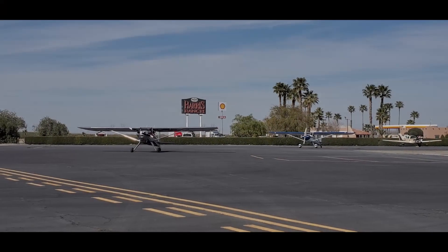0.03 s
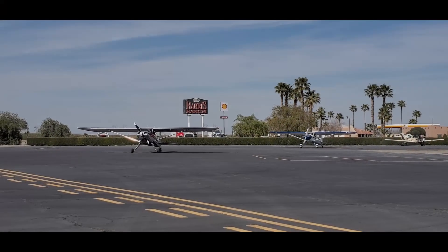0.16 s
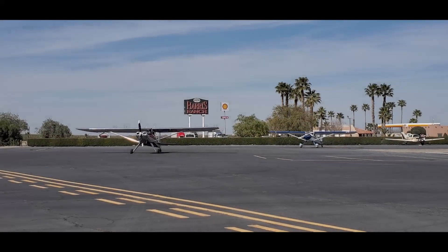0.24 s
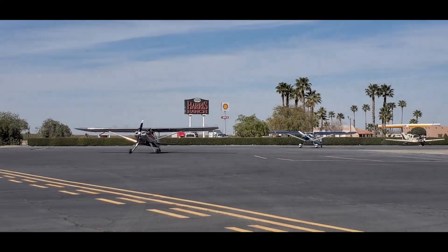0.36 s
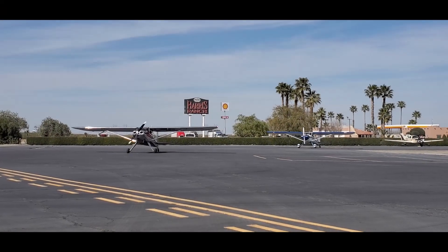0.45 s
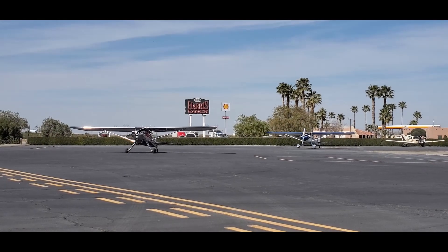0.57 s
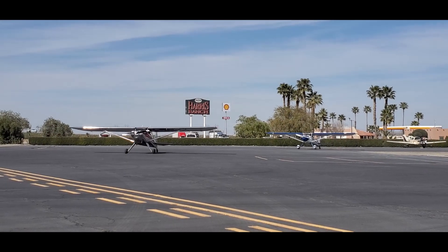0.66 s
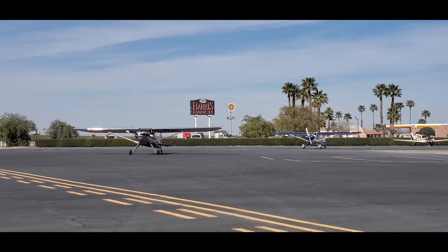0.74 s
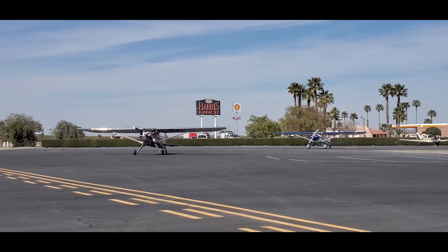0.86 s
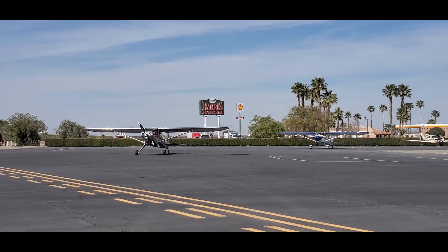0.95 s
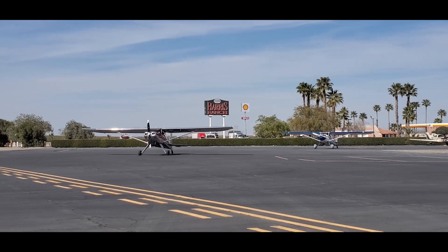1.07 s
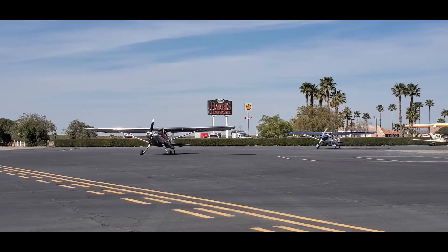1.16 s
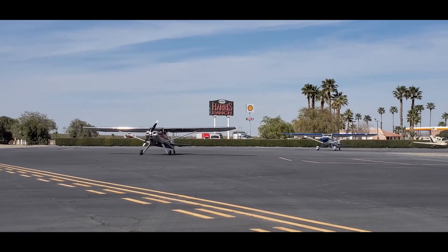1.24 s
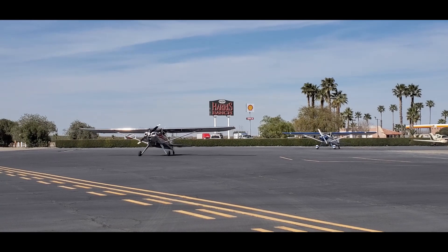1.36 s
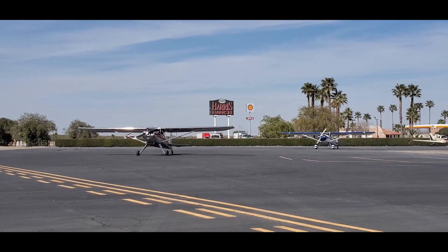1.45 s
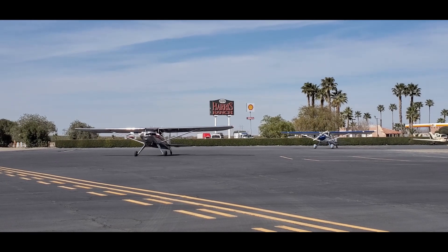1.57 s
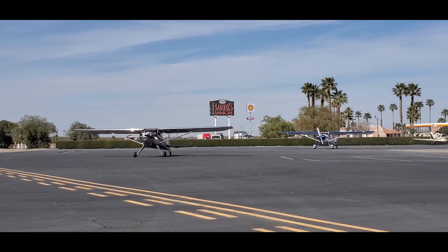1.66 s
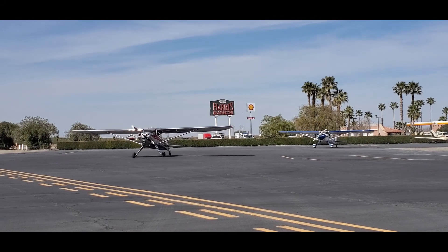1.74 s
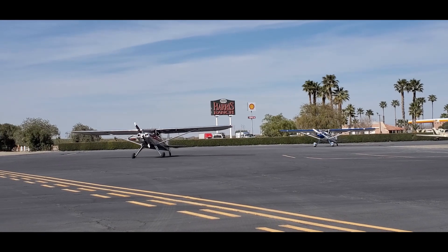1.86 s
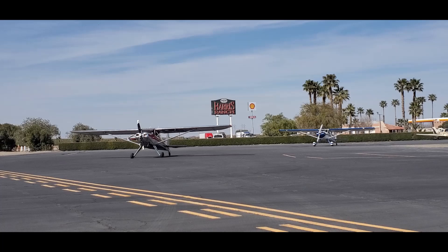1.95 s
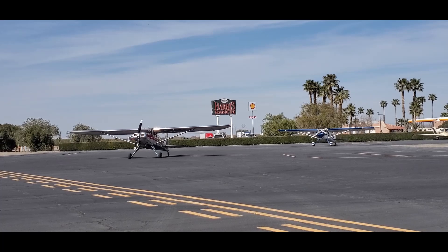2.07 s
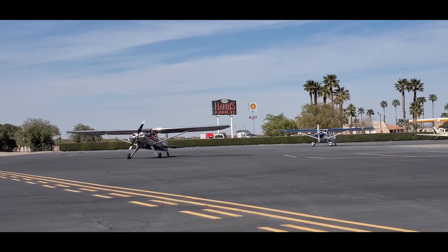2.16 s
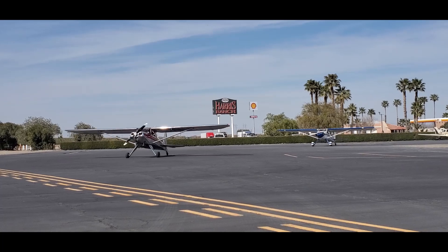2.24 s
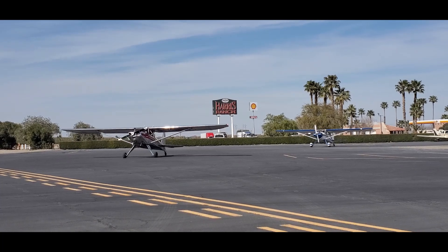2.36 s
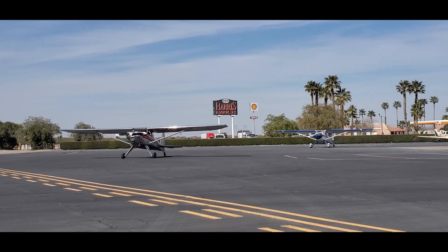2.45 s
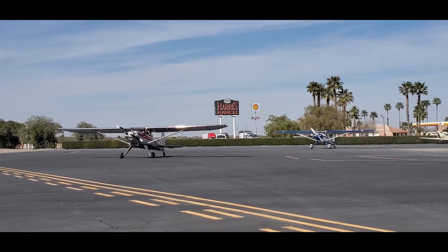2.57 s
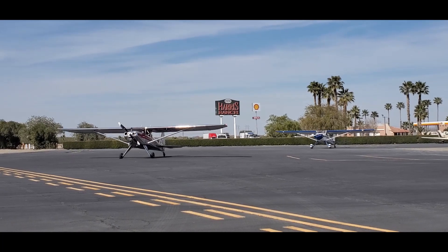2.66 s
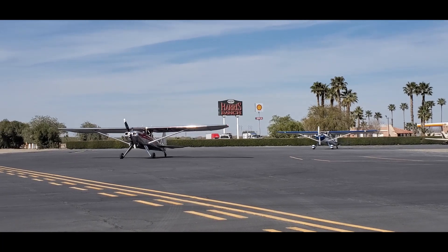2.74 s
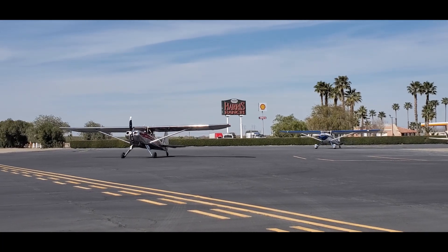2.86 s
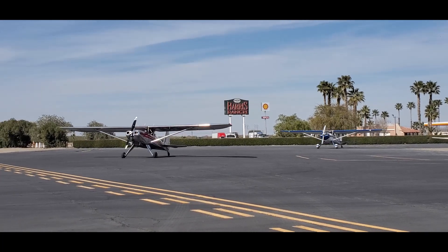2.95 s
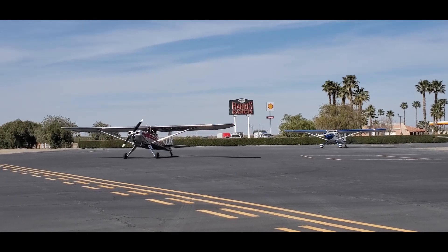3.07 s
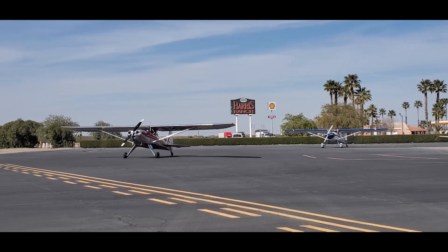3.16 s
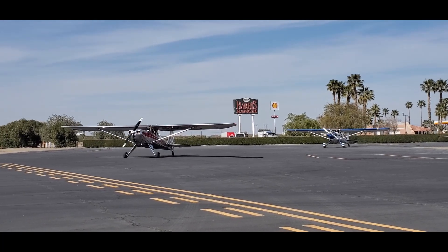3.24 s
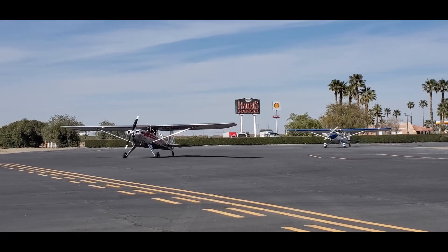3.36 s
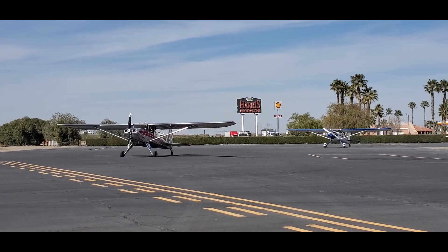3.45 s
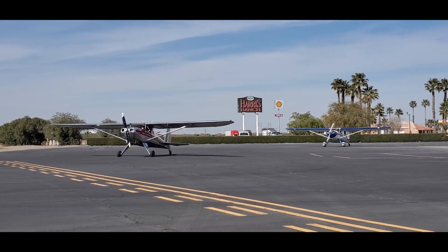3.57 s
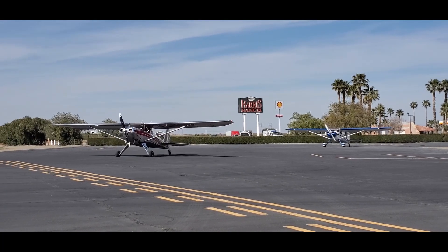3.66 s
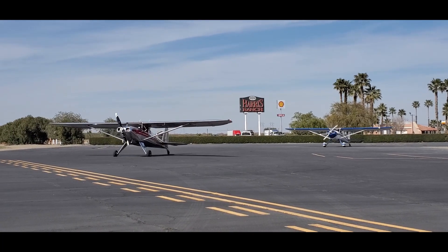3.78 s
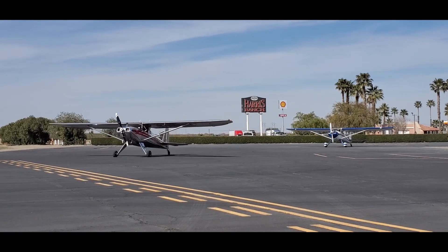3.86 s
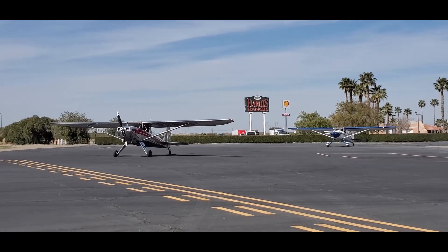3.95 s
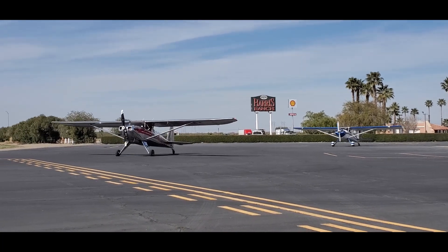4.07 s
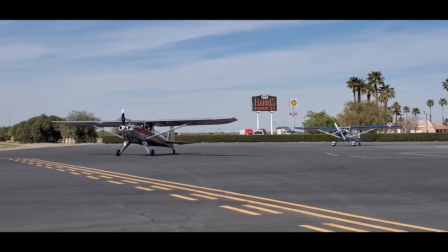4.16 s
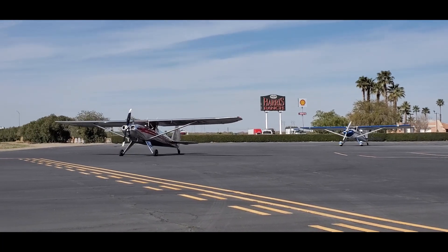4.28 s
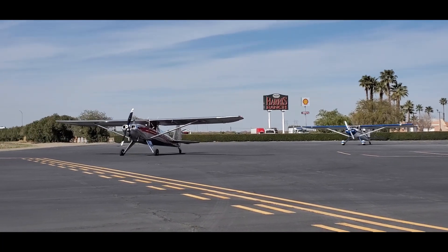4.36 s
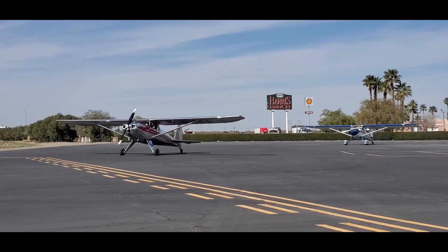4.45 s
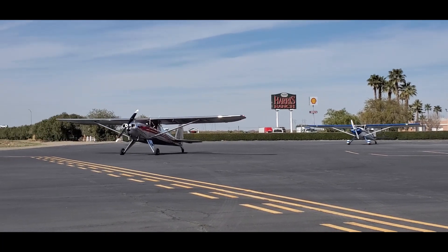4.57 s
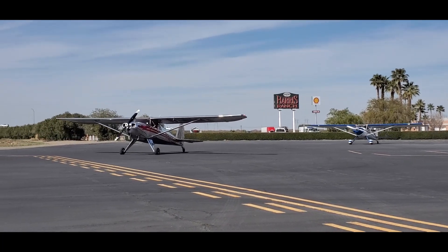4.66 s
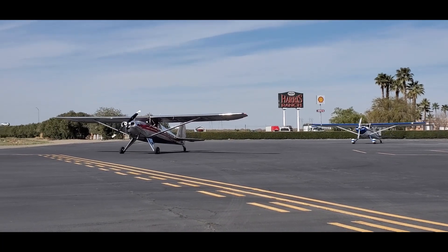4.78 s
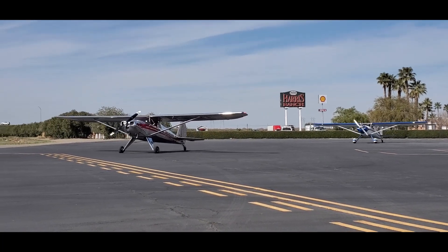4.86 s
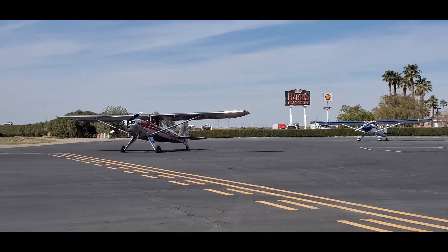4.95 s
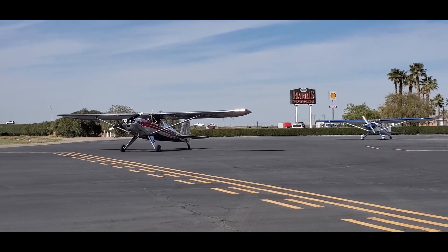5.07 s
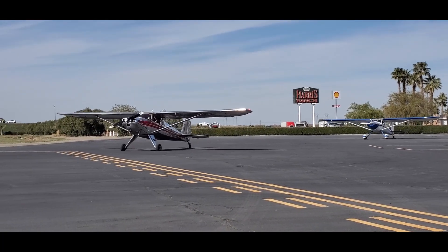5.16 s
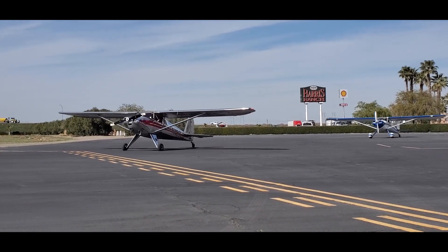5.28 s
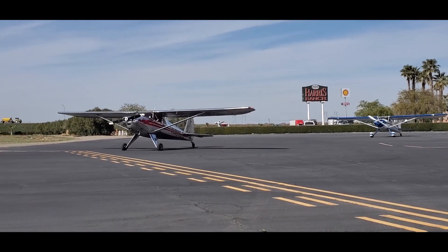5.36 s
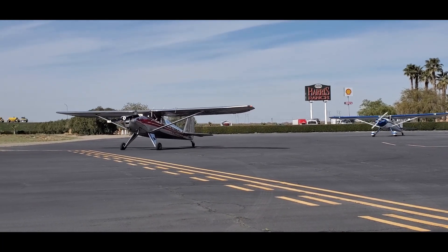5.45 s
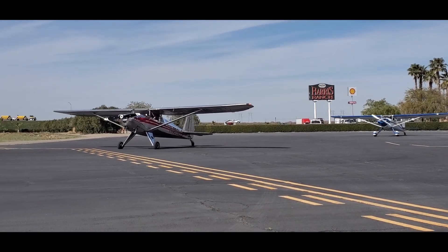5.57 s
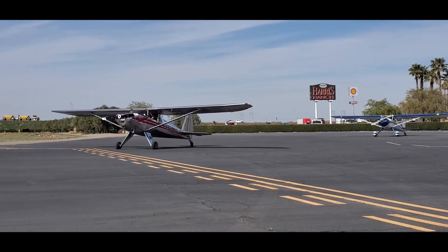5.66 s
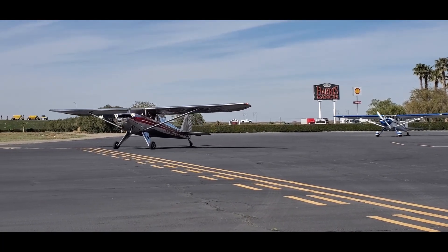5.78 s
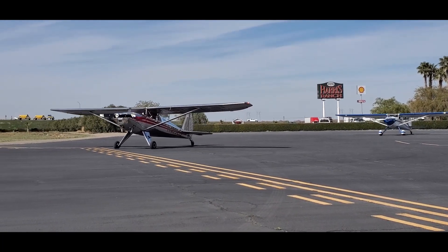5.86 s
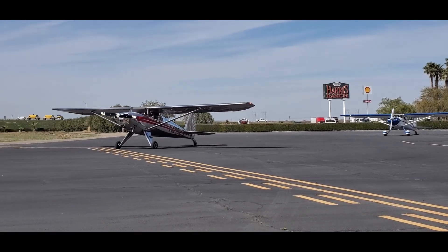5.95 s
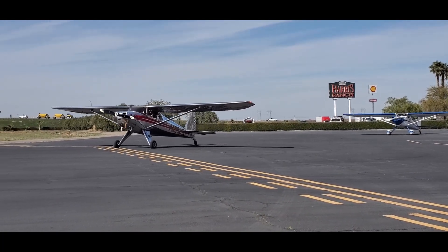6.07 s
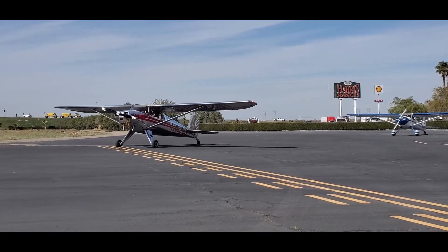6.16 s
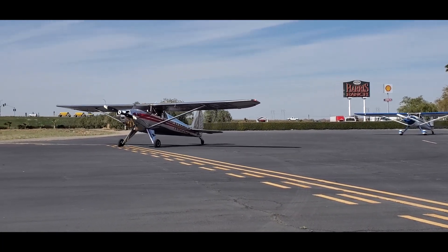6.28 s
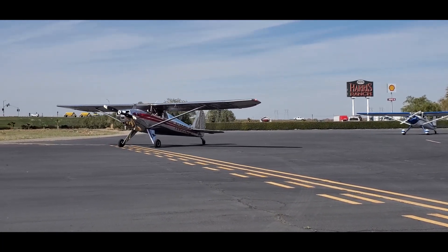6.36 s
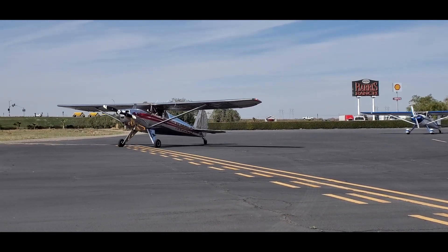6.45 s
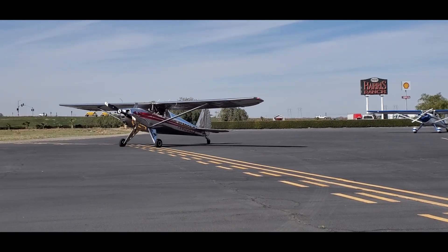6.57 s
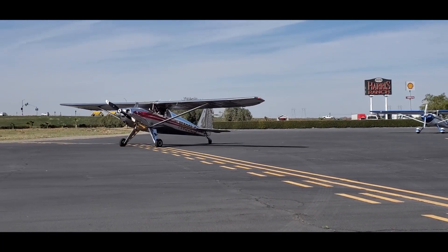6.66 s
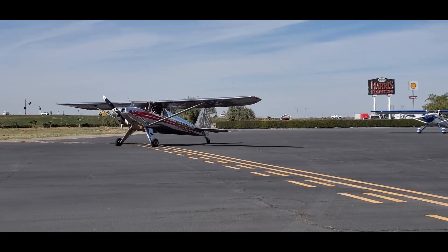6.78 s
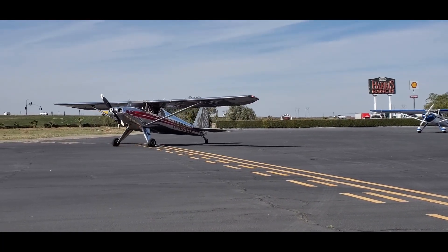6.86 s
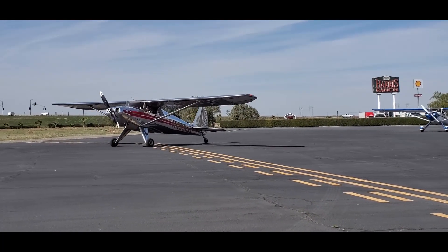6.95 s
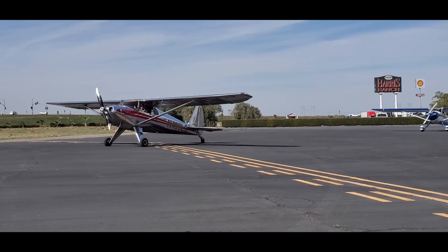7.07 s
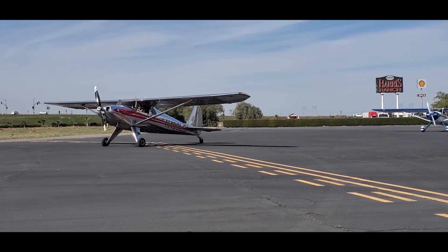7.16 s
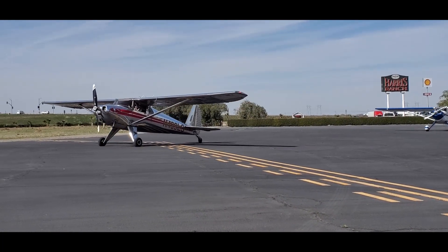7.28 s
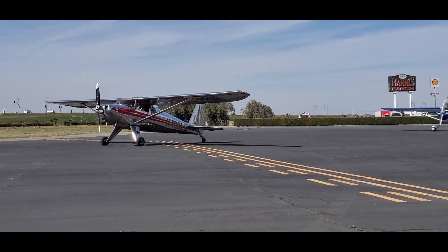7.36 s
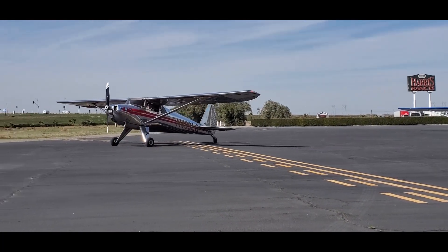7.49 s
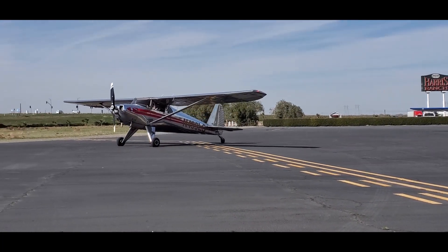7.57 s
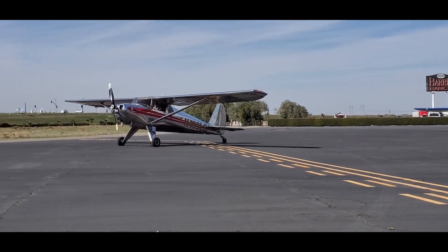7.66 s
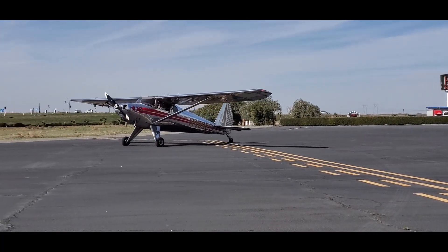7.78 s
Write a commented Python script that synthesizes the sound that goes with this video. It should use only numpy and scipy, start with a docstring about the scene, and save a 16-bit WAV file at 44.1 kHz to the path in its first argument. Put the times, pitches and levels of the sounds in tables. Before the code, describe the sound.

Outdoors on an open airport ramp, a light plane taxis slowly nearer with its piston engine idling. A low, uneven exhaust drone beats against the hum of a second plane further back. Fast metallic clatter and fluttering propeller air build over the first few seconds, then hold steady. The stereo microphone is exposed, with hollow reflections from the ground and a nearby surface.

```python
"""Light plane taxiing closer on an open ramp

A light plane taxis slowly closer over an open ramp, its flat-four engine loping at idle.
A second plane further back throttles down; exhaust drones are cosines tied to each shaft and beat together.
Noise pulsed by the shaft makes the valve clatter, once a turn; coloured noise makes the propeller rush.
The tarmac and a surface by the microphone return delayed copies that comb the sound.
Two faint squeaks pass early on, and two unlike microphone ports pick it all up."""
import sys
import numpy as np
from scipy import signal
from scipy.fft import rfft, irfft, next_fast_len
from scipy.io import wavfile
from scipy.ndimage import uniform_filter1d

SR = 44100
rng = np.random.default_rng(int(sys.argv[2]) if len(sys.argv) > 2 else 0)


def inscribe(sig):
    """Save sig as 16-bit PCM at rate SR to the path in sys.argv[1].

    A 1-D sig is mono; a 2-D sig holds one channel per row.
    Samples are clipped to [-1, 1] before scaling.
    """
    pcm = np.round(np.clip(np.atleast_2d(sig).T, -1, 1) * 32767)
    wavfile.write(sys.argv[1], SR, pcm.astype(np.int16))


N = 344862
T = np.arange(N) / SR

# engine speed of the near plane, then of the plane further back: [start_s, turns_per_second_hz]
NEAR_SPEED = [(0.0, 28.98), (1.0, 29.2), (2.0, 29.29), (2.7, 29.12), (3.1, 29.21), (3.45, 31.51),
              (3.8, 30.66), (4.2, 29.8), (4.7, 29.84), (5.5, 30.18), (6.4, 30.16), (7.0, 29.83),
              (7.5, 30.05), (7.82, 31.0)]
FAR_SPEED = [(0.0, 37.46), (1.0, 37.41), (1.7, 36.95), (2.5, 35.61), (3.3, 34.87), (4.5, 34.56),
             (6.0, 34.76), (7.82, 34.63)]


def shaft(speed, start_turns):
    """The crankshaft angle, in turns, is the running sum of its speed."""
    return np.cumsum(curve(speed)[0]) / SR + start_turns


# exhaust lines of each plane, levels relative to each other: [multiple_of_shaft_speed, level_db]
NEAR_ORDERS = [(2.0, -5.5), (2.5, -8), (2.75, -11.5), (3.0, 4), (3.25, -17), (3.5, -22), (3.75, -6.5),
               (4.0, -11), (4.25, -8), (4.5, -33), (4.75, -10.5), (5.0, -21.5), (5.25, -40), (5.5, -15.5),
               (6.0, -32), (6.5, -19), (7.0, -18.5)]
FAR_ORDERS = [(1.0, -26), (1.75, -17), (2.0, -3.5), (2.25, -8.5), (2.5, -29), (2.75, -7.5), (3.0, -11.5),
              (3.25, -15), (3.75, -12.5), (4.0, -10), (4.75, -17.5), (5.0, -24)]


def drone(turns, orders, lag_turns, waver_db, slip_cycles):
    """Exhaust lines: whole orders lock to the crank, uneven cylinders add drifting ones between."""
    out = 0
    for order, db in orders:
        phase = order * (turns - lag_turns)
        if order % 1 > 0:
            phase = phase + rng.random() + slip_cycles * walk(2.93)
        out = out + undb(db + waver_db * walk(6)) * np.cos(2 * np.pi * phase)
    return unit(out)


# tone of the exhaust burble: [pitch_hz, relative_level_db]
BURBLE_TONE = [(20, -29), (36, -23), (48, -5), (70, -14), (115, -5), (145, -4.5), (190, -11), (250, -6),
               (330, -22), (600, -54)]


def exhaust(turns):
    """No two firings are alike: their differences burble in the pipe, twice a turn, over steady noise."""
    firings = np.flatnonzero(np.diff(np.floor(2 * turns)))
    pulses = np.zeros(N)
    pulses[firings] = np.tanh(2 * rng.standard_normal(len(firings)))
    return unit(colour(unit(pulses) + 0.79 * air(), BURBLE_TONE))


# tone of the air off the near propeller: [pitch_hz, relative_level_db]
RUSH_TONE = [(150, 0), (280, -3), (430, -2), (530, 1.5), (620, 0.5), (900, -3.5), (1050, -2), (1300, -4),
             (1650, -4), (2300, -11.5), (3200, -16.5), (4500, -21.5), (7800, -37.5), (11500, -26.5),
             (16000, -38)]


def propeller(turns):
    """Air torn by two blades, throbbing as each passes and fluttering with turbulence."""
    throb = 1 + 0.14 * np.cos(4 * np.pi * turns)
    flutter = undb(1.0 * walk(12) + 1.18 * walk(90))
    return unit(colour(air() * throb * flutter, RUSH_TONE))


# near valve gear over time, before the trims below: [start_s, clack_level_db, tick_level_db]
VALVE_LEVELS = [(0, -46.5, -50.5), (1, -39.5, -55), (2, -39, -48.5), (3.1, -37, -55.5), (3.5, -38.5, -48.5),
                (4.4, -35.5, -42.5), (5.3, -35, -49), (6.2, -37.5, -47.5), (6.9, -35.5, -43.5),
                (7.82, -39, -40.5)]
# relative blow strengths in a lope of four turns; the ticks trade strength as the plane swings side-on:
# [clack_db, edge_db, tick_nose_on_db, tick_side_on_db]
LOPE = [(1, 0.5, 2, 1), (2, 6, 3.5, -1.5), (-1.5, -1.5, -7, -2), (1.5, 1.5, -6, 3.5)]
# tones of the clack, its hard edge and the bright tick: [pitch_hz, relative_level_db]
CLACK_TONE = [(900, -25), (2000, -6.5), (2700, -4.5), (3100, 6), (3800, 3), (4400, -9), (5400, -32),
              (7500, -43)]
EDGE_TONE = [(3200, -5.5), (4100, 3), (4800, -2.5), (5600, -7), (6300, -7.5), (7600, -17.5), (10000, -16.5)]
TICK_TONE = [(5000, -51), (8000, -31), (9500, -5), (11000, 3.5), (12800, 8), (14500, -2), (16000, -20)]
CLACK_TRIM_DB, EDGE_TRIM_DB, TICK_TRIM_DB, STRAY_DB = -2, -7.5, -2, 0.5
KNOCK_CLACK_DB, KNOCK_EDGE_DB = -6, -11


def valve_gear(turns):
    """Metal contacts as shaped noise: clack, edge and tick each turn, now and then a harder knock."""
    clack_db, tick_db = curve(VALVE_LEVELS)
    clack_pattern, edge_pattern, nose_on, side_on = np.transpose(LOPE)
    clack = blows(turns, clack_pattern, scatter_db=4.0, jitter=0.025, lead=0.16,
                  rise=0.049, decay=0.2, tail=0.27, tail_decay=0.42)
    edge = blows(turns, edge_pattern, scatter_db=1.5, jitter=0.025, lead=0.15,
                 rise=0.055, decay=0.17, tail=0.4, tail_decay=0.2)
    tick = blows(turns, nose_on, scatter_db=3.5, jitter=0.034, lead=0.17,
                 rise=0.042, decay=0.16, tail=0.33, tail_decay=0.28)
    swing_db = np.take(side_on - nose_on, np.floor(turns + 1 / 4).astype(int), mode="wrap")
    tick = tick * undb(swing_db * T / T[-1])
    knock, bright_knock = knocks()
    stray = loose_parts(per_second=20, spread_db=5, ring_s=0.0036) * undb(STRAY_DB)
    layers = (
        (clack, clack_db + CLACK_TRIM_DB, knock * undb(KNOCK_CLACK_DB), CLACK_TONE),
        (edge, clack_db + EDGE_TRIM_DB, knock * undb(KNOCK_EDGE_DB), EDGE_TONE),
        (tick, tick_db + TICK_TRIM_DB, bright_knock, TICK_TONE),
    )
    out = 0
    for strokes, db, hard, tone in layers:
        strokes = strokes / np.sqrt(np.mean(strokes ** 2))
        strokes = np.hypot(strokes, stray) * undb(db)
        # each stroke is a cluster of tiny contacts
        contacts = undb(2.64 * np.tanh(walk(500)))
        out = out + unit(colour(air(), tone)) * np.maximum(strokes, hard) * contacts
    return out


def blows(turns, pattern_db, scatter_db, jitter, lead, rise, decay, tail, tail_decay):
    """One blow a turn: a short chatter and a weaker ring after it (times in turns)."""
    count = np.floor(turns + lead).astype(int) + 4  # keeps the count positive, in step with the four
    size, shift = rng.standard_normal((400, 2)).T
    late = jitter * (1 + np.tanh(shift[count]))
    age = np.maximum((turns + lead) % 1 - late, 0)
    attack = 1 - np.exp(-(age / rise) ** 2)
    shape = attack * (np.exp(-(age / decay) ** 2) + tail * np.exp(-age / tail_decay))
    blow_db = np.take(pattern_db, count, mode="wrap") + scatter_db * 2 * np.tanh(size[count] / 2)
    return shape * undb(blow_db)


# valve strokes that stand out as hard knocks, before envelope and layer gains:
# [start_s, level_db, treble_relative_db]
KNOCKS = [(0.0458, -23, -14), (0.183, -22, -17), (0.3197, -22, -10), (1.6574, -13.5, -22),
          (2.2387, -12.5, -25), (3.3934, -18, -23), (3.457, -14, -16), (3.9764, -13.5, -8),
          (4.0746, -23, -20), (4.2096, -12.5, -21), (4.308, -13.5, -23), (4.646, -11.5, -21),
          (4.7787, -14, -21), (5.0464, -12, -23), (5.445, -15, -22), (6.0091, -16.5, -19),
          (7.639, -14.5, -17)]
KNOCK_LEAD_S, KNOCK_RISE_S, KNOCK_DECAY_S = 0.00038, 0.00065, 0.0031


def knocks():
    """Hard blows rise at once and die within milliseconds: envelopes of body and treble."""
    body, bright = np.zeros((2, N))
    for s, db, treble_db in KNOCKS:
        near = slice(max(int(s * SR) - 200, 0), int(s * SR) + 900)
        age = np.maximum(T[near] - s + KNOCK_LEAD_S, 0)
        shape = (1 - np.exp(-age / KNOCK_RISE_S)) * np.exp(-(age / KNOCK_DECAY_S) ** 2)
        body[near] += undb(db) * shape
        bright[near] += undb(db + treble_db) * shape
    return body, bright


def loose_parts(per_second, spread_db, ring_s):
    """Small stray clicks at random moments, each with an exponentially dying envelope."""
    chance, size = rng.random(N), rng.standard_normal(N)
    hits = (chance < per_second / SR) * undb(spread_db * np.tanh(size))
    return signal.lfilter([1], [1, -np.exp(-1 / (ring_s * SR))], hits)


# mechanical noise of the plane further back: [start_s, level_db]
FAR_NOISE = [(0, -37.5), (.6, -34.5), (1.4, -31.5), (2.25, -31.5), (2.6, -35.5), (4, -42), (7.82, -41)]
# tones of its rush and of its valve rattle: [pitch_hz, relative_level_db]
FAR_RUSH_TONE = [(200, -14), (500, 7.5), (1000, 4.5), (1500, 6), (2100, 6), (2700, 5), (3500, -0.5),
                 (5000, -26.5), (7800, -41), (10500, -39), (12500, -23), (16000, -43)]
FAR_RATTLE_TONE = [(2000, 1), (3300, 8.5), (4400, -3), (5500, -20), (7800, 0), (10000, -15.5), (12500, -25),
                   (16000, -36)]


def far_plane(turns):
    """Fluttering air and shaft-timed valve rattle from further back, with a full tarmac bounce."""
    strokes = blows(turns, [1.5, 2.4, 8, 1], scatter_db=5.5, jitter=0.05, lead=0.834,
                    rise=0.055, decay=0.19, tail=0.14, tail_decay=0.25)
    flutter = undb(1.0 * walk(14) + 1.04 * walk(90))
    rush = unit(colour(air() * flutter, FAR_RUSH_TONE))
    rattle = unit(colour(air() * strokes, FAR_RATTLE_TONE))
    sound = rush + undb(-13.0) * rattle
    return unit(tarmac(sound, share=1.0)) * undb(curve(FAR_NOISE)[0])


# thin squeaks: [centre_s, swell_s, level_db]
SQUEAKS = [(.22, .035, -58), (.505, .018, -52)]


def squeaks():
    """Two faint, very high squeaks: narrow noise near 14.6 kHz under bell-shaped swells."""
    swell = sum(undb(db) * np.exp(-((T - s) / length) ** 2) for s, length, db in SQUEAKS)
    tone = [(13500, -60), (14400, -8), (14620, 0), (14850, -8), (15700, -60)]
    return swell * unit(colour(air(), tone))


def tarmac(x, share):
    """The grazing bounce off the ground comes a moment late and cuts notches near 2.6 and 7.9 kHz."""
    return (x + share * delayed(x, delay_ms=0.19)) / np.sqrt(1 + share ** 2)


# extra path by way of a surface close to the microphone: [start_s, delay_ms]
ECHO_DELAY = [(0, 2.02), (2.3, 1.995), (4.5, 1.97), (5.6, 1.884), (7.82, 1.9)]


def nearby_surface(close, distant):
    """A duller echo comes round again and again: hollow bands about 500 to 530 Hz apart."""
    echo_ms = curve(ECHO_DELAY)[0]
    close_echo = colour(close, [(100, -20), (1000, -7.5), (3500, -12.5), (6000, -9.5), (16000, -18)])
    distant_echo = colour(distant, [(100, -40), (1800, -4.5), (2800, -21), (6000, -32)])
    first = delayed(close_echo + distant_echo, echo_ms)
    second = 0.29 * delayed(first, echo_ms)
    third = 0.7 * delayed(second, echo_ms)
    return first + second + third


def delayed(x, delay_ms):
    """Both channels arrive later, by a time that may move."""
    place = np.arange(N) - delay_ms * SR / 1000
    return np.array([np.interp(place, np.arange(N), c) for c in x])


# sound arriving from all around, side noise against middle: [pitch_hz, side_level_db]
WIDTH = [(60, -39), (200, -10.5), (400, -19), (700, -11), (1300, -7), (2400, -2), (4400, -2.5),
         (8000, -3.5), (15000, -2.5)]


def air():
    """White stereo noise, alike in the bass and nearly unrelated in the treble."""
    mid, side = rng.standard_normal((2, N))
    side = colour(side, WIDTH)
    return np.array([mid + side, mid - side])


def colour(x, points):
    """Filter by a (Hz, dB) outline, falling 12 dB an octave beyond its ends."""
    hz, db = np.transpose(points)
    size = next_fast_len(N + 4096)
    f = np.maximum(np.fft.rfftfreq(size, 1 / SR), 1)
    outside = np.minimum(f / hz[0], 1) ** 2 * np.minimum(hz[-1] / f, 1) ** 2
    gain = outside * undb(np.interp(np.log(f), np.log(hz), db))
    return irfft(rfft(x, size) * gain, size)[..., :N]


def walk(rate_hz):
    """Smooth random drift with a spread of 1."""
    k = int(SR / rate_hz)
    held = np.repeat(rng.standard_normal(N // k + 1), k)
    return unit(uniform_filter1d(uniform_filter1d(held, k), k)[:N])


def curve(rows):
    """Each column of a time table, sample by sample."""
    s, *columns = np.transpose(rows)
    return [np.interp(T, s, c) for c in columns]


def unit(x):
    """Scale so that the middle of the stereo image has a spread of 1."""
    return x / np.std(np.atleast_2d(x).mean(axis=0))


def undb(db):
    """Decibels to gain."""
    return 10 ** (np.asarray(db) / 20)


# loudness as the planes move, drones before trims:
# [start_s, near_drone_level_db, far_drone_level_db, near_propeller_level_db]
APPROACH = [(0, -32, -27, -40), (.6, -28, -27, -37.5), (1.4, -25.5, -21.5, -34.5), (2.1, -25, -22, -34),
            (2.7, -24, -26, -32.5), (3.5, -24, -21.5, -31), (4.4, -23.5, -23, -31.5),
            (5.2, -23.5, -22.5, -31), (6.2, -22.5, -22.5, -31), (7.35, -22.5, -25.5, -31),
            (7.82, -21, -22, -30.5)]
# strength of the near plane's bounce off the tarmac: [start_s, share_0_to_1]
BOUNCE = [(0, 0.53), (2.1, 0.44), (2.6, 0.11), (7.82, 0.19)]


def scene():
    """Both planes on the ramp: direct drones and burble, other noise with its reflections."""
    near = shaft(NEAR_SPEED, -0.402)
    far = shaft(FAR_SPEED, 0)
    near_db, far_db, rush_db = curve(APPROACH)
    near_hum = drone(near, NEAR_ORDERS, lag_turns=0.438, waver_db=-0.23, slip_cycles=0.045)
    far_hum = drone(far, FAR_ORDERS, lag_turns=0.97, waver_db=-0.5, slip_cycles=0.039)
    hum = near_hum * undb(near_db + 3.5) + far_hum * undb(far_db + 0.5)
    burble = exhaust(near) * undb(0.59 * near_db - 18.5)
    close = propeller(near) * undb(rush_db) + valve_gear(near)
    close = tarmac(close, curve(BOUNCE)[0])
    distant = far_plane(far)
    noise = close + distant + nearby_surface(close, distant)
    return hum + burble + noise + squeaks()


# phase by which the left microphone port leads the right: [pitch_hz, lead_radians]
PORT_LEAD = [(0, 0), (1200, 0.25), (2900, -0.5), (4500, 2), (5200, 3.5), (5800, 5.5), (7000, 10), (9500, 8),
             (11000, 14.5), (11700, 14), (12500, 17.5), (13700, 19), (15000, 22), (16000, 37)]
# how much more the left port hears than the right: [pitch_hz, difference_db]
PORT_BALANCE = [(60, 1), (110, 0.5), (200, 1.5), (380, 1.0), (700, 2.5), (1290, -0.5), (2380, 3.5),
                (4400, 1.5), (8120, -1.5), (15000, 4.5)]
TOP_HZ = 15900


def record(dry):
    """The two microphone ports differ in level and phase; the recorder cuts the top."""
    size = next_fast_len(N + 4096)
    f = np.fft.rfftfreq(size, 1 / SR)
    phase = np.interp(f, *np.transpose(PORT_LEAD))
    hz, db = np.transpose(PORT_BALANCE)
    left_db = np.interp(np.log(f + 1), np.log(hz), db)
    # half of each difference goes to either port
    gain = undb(np.array([left_db, -left_db]) / 2)
    turn = np.exp(0.5j * np.array([phase, -phase]))
    ports = irfft(rfft(dry, size) * gain * turn, size)[:, :N]
    top_cut = signal.ellip(10, 0.2, 70, TOP_HZ, fs=SR, output="sos")
    return signal.sosfilt(top_cut, ports)


dry = scene()
out = record(dry)
inscribe(out)
```